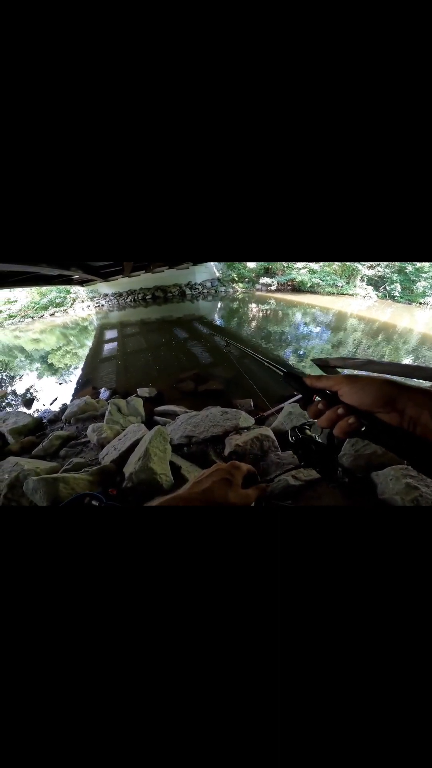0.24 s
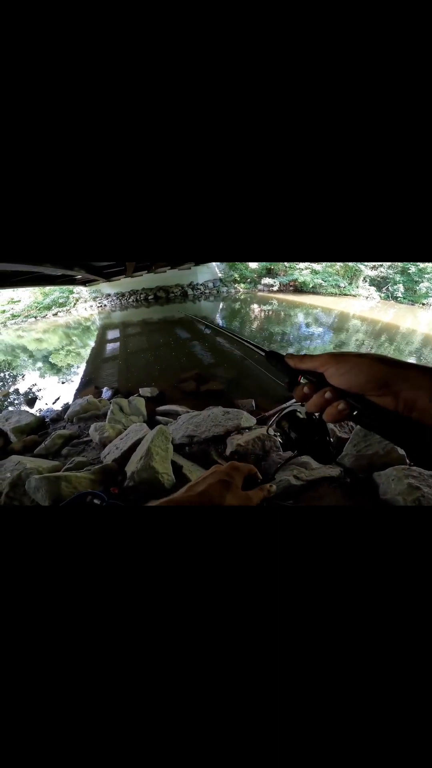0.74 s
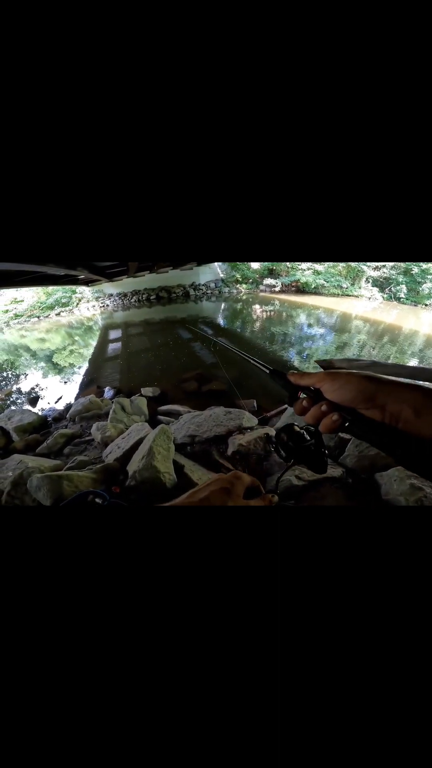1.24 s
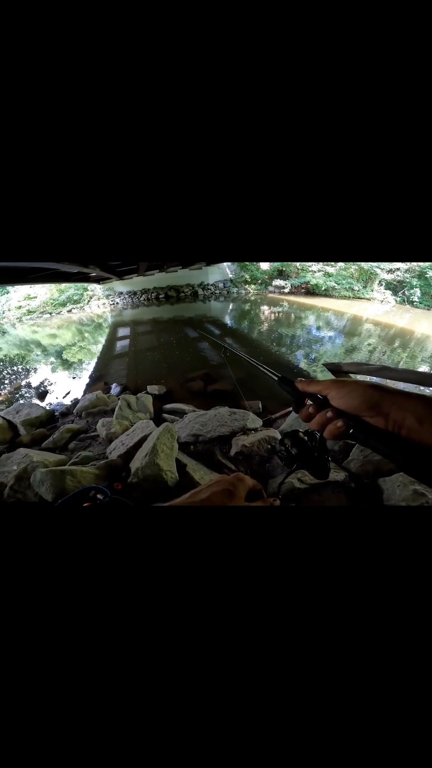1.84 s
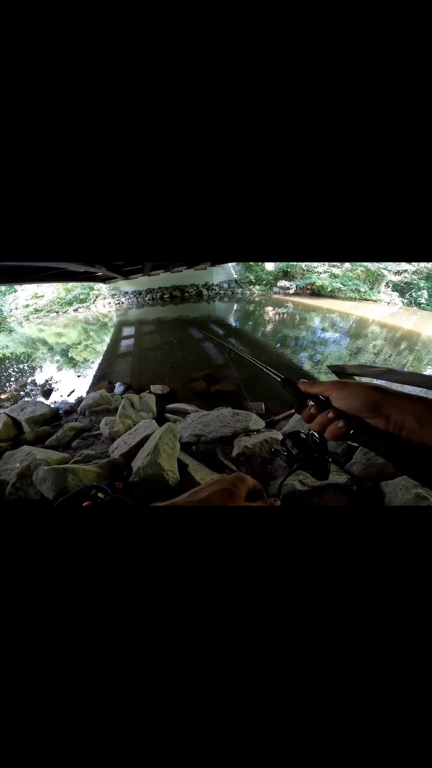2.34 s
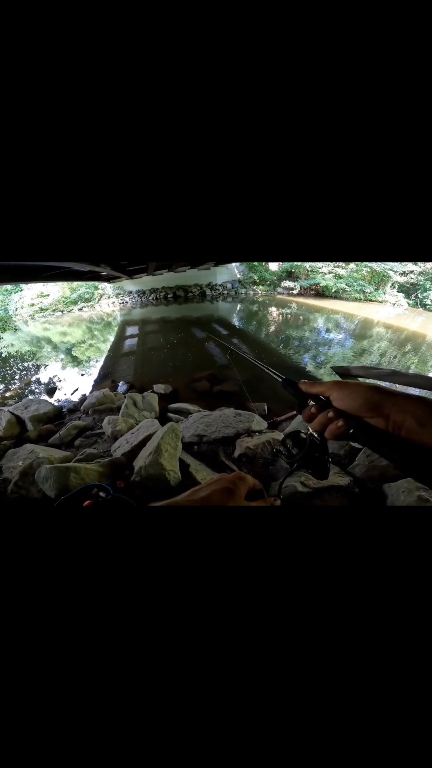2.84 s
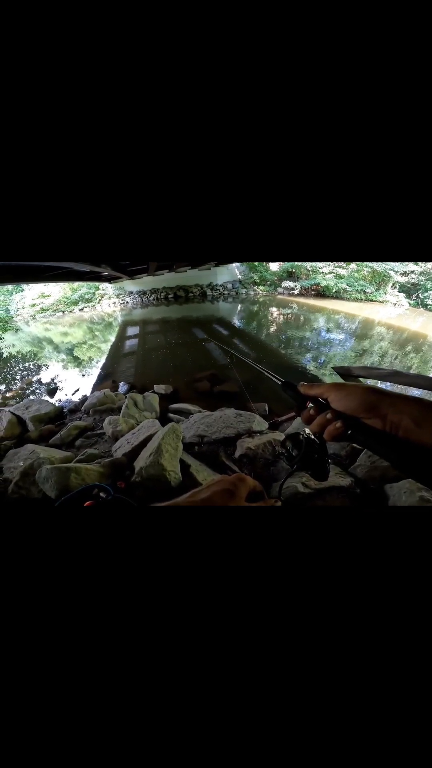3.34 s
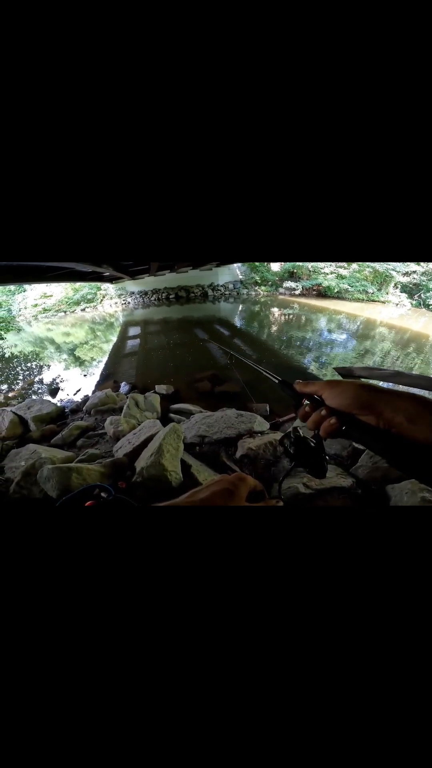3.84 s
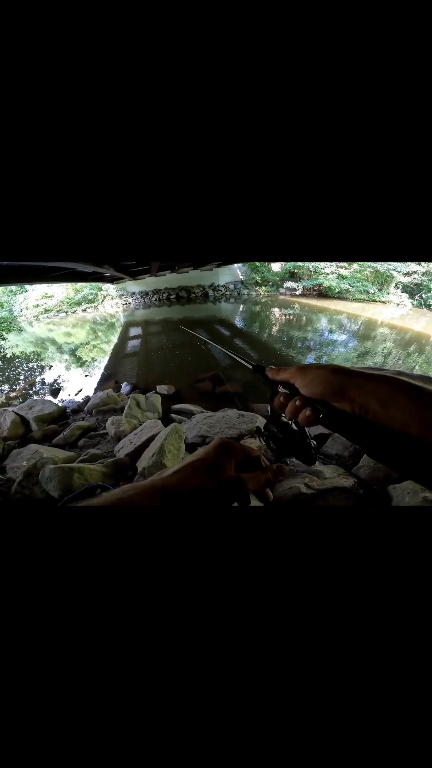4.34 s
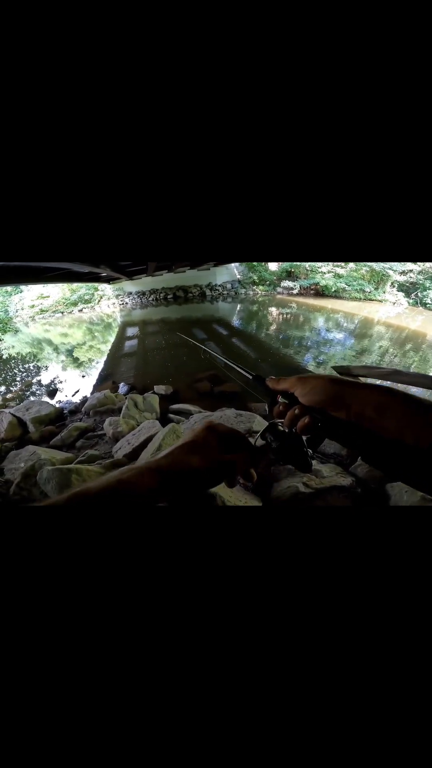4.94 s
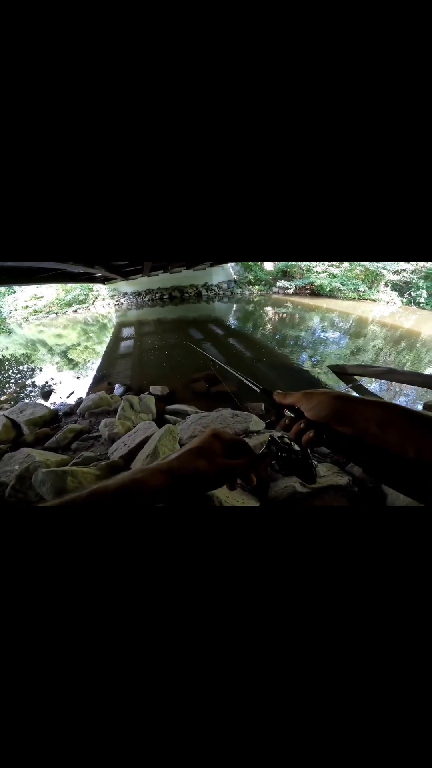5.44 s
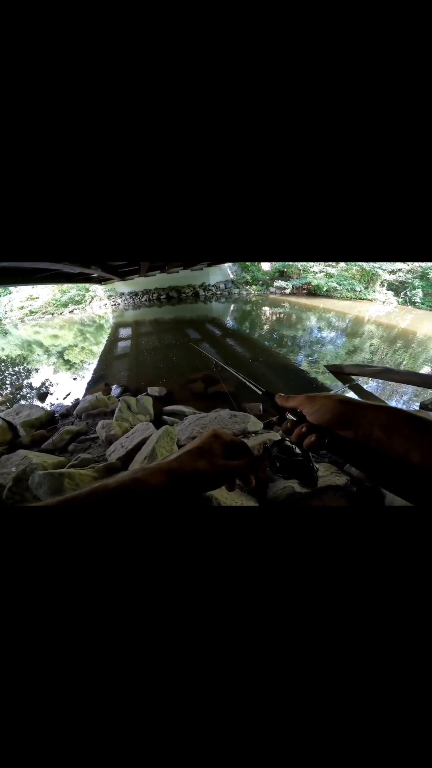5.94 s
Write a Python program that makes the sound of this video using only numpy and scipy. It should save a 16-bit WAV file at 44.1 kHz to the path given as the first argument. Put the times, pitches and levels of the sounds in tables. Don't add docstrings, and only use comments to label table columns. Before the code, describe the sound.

Continuous bright cricket chorus, a little stronger to the left, over faint distant traffic. Low, irregular bridge thuds and a muffled engine rumble build in the middle, with a breathy tyre wash, then thin out. A small drip, two quick bird twitters on the right and a few tiny close metal ticks pass faintly. Open outdoor stereo pickup beneath the span, with short reflections from stone and water.

```python
import sys
import numpy as np
from scipy import signal
from scipy.fft import rfft, irfft, next_fast_len
from scipy.io import wavfile
from scipy.ndimage import uniform_filter1d

SR = 44100
rng = np.random.default_rng(int(sys.argv[2]) if len(sys.argv) > 2 else 0)


def invert_db(level):
    return 10 ** (np.asarray(level, dtype=float) / 20)


def generate_wav(signal):
    frames = np.transpose(np.atleast_2d(signal))
    scaled = np.clip(frames, -1, 1) * 32767
    pcm = np.round(scaled).astype(np.int16)
    wavfile.write(sys.argv[1], SR, pcm)


N = 273851


def evened(x):
    return x / np.sqrt(np.mean(x ** 2) + 1e-20)


def read(points, hz):
    f, value = np.transpose(points)
    return np.interp(np.log(hz + 1), np.log(f + 1), value)


def add(mix, start_s, sound):
    part = mix[round(start_s * SR):][:len(sound)]
    part += sound[:len(part)]


def wander(top_hz):
    f = np.geomspace(top_hz / 12, top_hz, 16)
    t = np.arange(0, N + 256, 256) / SR
    phase = 2 * np.pi * (t[:, None] * f + rng.random(16))
    slow = np.sin(phase) @ f ** -.5
    return evened(np.interp(np.arange(N) / SR, t, slow))


# frequency in Hz, left-right likeness from 0 to 1.
COHERENCE = [(30, .998), (60, .9996), (150, .999), (250, .993), (450, .96), (720, .83), (1100, .83),
             (2200, .74), (3500, .59), (5500, .76), (6800, .87), (7500, .82), (8200, .55), (8800, .72),
             (11000, .4)]
# frequency in Hz, left minus right in dB.
LEVEL_DIFFERENCE = [(150, 0), (250, .2), (450, 1.6), (900, 3.8), (1400, 3.1), (2200, 2.6), (3500, -.5),
                    (4500, -1.1), (5500, -.2), (7400, 5), (8200, 1.8), (8800, .4), (10500, 2.7), (12000, 5)]
# frequency in Hz, lead of the left in radians.
PHASE_LEAD = [(150, 0), (450, -.05), (720, -.29), (1100, -.44), (2200, -.94), (2800, -.95), (3600, -.46),
              (4500, -.16), (5500, 0), (7400, .07), (8200, .29), (8800, 0)]


def noise(colour):
    size = next_fast_len(N)
    hz = np.fft.rfftfreq(size, 1 / SR)
    shared, separate = rfft(rng.standard_normal((2, size)))
    same = np.clip(read(COHERENCE, hz), -1, 1)
    lean = invert_db(read(LEVEL_DIFFERENCE, hz) / 2)
    delayed = shared * np.exp(-1j * read(PHASE_LEAD, hz))
    left = shared * lean
    right = (same * delayed + np.sqrt(1 - same ** 2) * separate) / lean
    heard = (hz > colour[0][0]) & (hz < colour[-1][0])
    pair = irfft(np.array([left, right]) * invert_db(read(colour, hz)) * heard, size)[:, :N]
    return pair / np.sqrt(np.mean(pair.mean(0) ** 2))


def steadied(pair, seconds):
    power = uniform_filter1d(pair.mean(0) ** 2, round(seconds * SR))
    return pair / np.sqrt(abs(power) + 0.046)


def bank(x, t60):
    taps = np.zeros((2, SR))
    at = np.arange(200, SR - 20, 20) + rng.integers(0, 20, (2, (SR - 201) // 20))
    np.put_along_axis(taps, at, rng.choice([-1., 1.], at.shape), 1)
    taps *= invert_db(-60 * np.arange(SR) / SR / t60)
    return signal.fftconvolve(x[None], taps / np.linalg.norm(taps[0]), axes=1)[:, :N]


def swells(floor_db, rows):
    t = np.arange(0, N + 64, 64) / SR
    power = sum(invert_db(2 * db) * np.exp(-((t - s) / half) ** 2) for s, half, db in rows)
    return np.sqrt(invert_db(2 * floor_db) + np.interp(np.arange(N) / SR, t, power))


# time in seconds, weight on the span from 0 to 1, nearness of the tyres from 0 to 1.
PASSAGE = [(0, 0.2, 0.27), (.3, 0, 0.47), (.65, 0.18, 0.2), (1.2, 0.04, 0.35), (1.28, 0.43, .25),
           (1.45, 0.5, 0.46), (2.0, 0.91, 0.43), (2.4, .9, 0.46), (2.9, 0.91, 0.66), (3.4, 0.96, 0.95),
           (3.8, 0.88, .95), (4.15, 0.94, 0.5), (4.35, 0.64, 0.4), (4.7, 0.39, 0.1), (5.1, 0.22, 0.22),
           (5.7, 0.04, 0.1), (6.0, 0.14, 0.4), (6.21, 0.36, 0.4)]


def loaded(empty_db, full_db, lag_s, order=1):
    curve = np.transpose(PASSAGE)
    return empty_db + (full_db - empty_db) * np.interp(np.arange(N) / SR - lag_s, curve[0], curve[order])


# frequency in Hz, level in dB per Hz.
SWAY_COLOUR = [(4, -10.5), (8, 4.5), (14, 10), (18, 9.5), (24, -3), (30, 2.5), (40, -66)]
# frequency in Hz, level in dB per Hz.
BOOM_COLOUR = [(22, -60.5), (30, -13), (38, -3), (46, -6), (52, 2.5), (58, -6.5), (65, -10.5), (74, -37.5),
               (100, -90)]
# time in seconds, sway level in dB, boom level in dB.
JOINT_JOLTS = [(.2, -36.5, -38), (.43, -34.5, -41), (.92, -54, -35.5), (1.13, -36, -35), (1.44, -32, -37),
               (1.62, -48, -28.5), (1.79, -28, -31.5), (2.07, -27.5, -38), (2.4, -26.5, -43),
               (2.7, -28, -44), (2.89, -33.5, -32.5), (3.21, -30.5, -36), (3.33, -25.5, -29.5),
               (3.55, -24.5, -37), (3.82, -24, -42), (3.96, -42, -29.5), (4.15, -25.5, -30.5),
               (4.39, -34.5, -26), (4.6, -32.5, -28), (4.77, -30.5, -27.5), (4.97, -33, -32),
               (5.14, -31.5, -37), (5.33, -31.5, -30.5), (5.52, -49, -30), (5.78, -35, -35.5),
               (5.94, -39.5, -37.5), (6.1, -34, -49)]


def deck():
    sway_jolts = [(s, 0.071, db) for s, db, _ in JOINT_JOLTS]
    boom_jolts = [(s, 0.057, db) for s, _, db in JOINT_JOLTS]
    sway = swells(loaded(empty_db=-58, full_db=-30.5, lag_s=.3), sway_jolts)
    boom = swells(loaded(empty_db=-39, full_db=-40.5, lag_s=.3), boom_jolts)
    return sway * steadied(noise(SWAY_COLOUR), 0.15) + boom * steadied(noise(BOOM_COLOUR), 0.11)


# frequency in Hz, level in dB per Hz.
ENGINE_COLOUR = [(41, -36.5), (69, -0.5), (113, -0.5), (190, -10), (250, -28.5), (420, -120)]
# frequency in Hz, level in dB per Hz.
DRONE_COLOUR = [(110, -30), (190, -1), (339, -5), (386, -11), (473, -9), (700, -14), (910, -38),
                (1540, -120)]
# time in seconds, half length in seconds, level in dB.
ENGINE_SURGES = [(0.1, 0.031, -43), (0.417, .05, -43), (1.154, 0.017, -36), (1.29, 0.034, -31.5),
                 (1.436, 0.12, -30.5), (1.757, 0.24, -31.5), (2.504, 0.12, -36), (2.695, 0.048, -33.5),
                 (3.247, 0.064, -42), (3.673, 0.078, -32.5), (3.915, 0.12, -31), (4.182, 0.098, -30.5),
                 (4.397, 0.035, -32), (4.65, 0.13, -35), (4.944, 0.1, -36.5), (5.385, 0.091, -38)]


def engine_and_body():
    shudders = [(s, half, db - 10.5) for s, half, db in ENGINE_SURGES]
    engine = swells(loaded(empty_db=-40.5, full_db=-33, lag_s=0.01), ENGINE_SURGES)
    drone = swells(loaded(empty_db=-51.5, full_db=-35.5, lag_s=0.0091), shudders)
    return engine * steadied(noise(ENGINE_COLOUR), 0.062) + drone * steadied(noise(DRONE_COLOUR), 0.079)


# frequency in Hz, level in dB per Hz.
ROAR_COLOUR = [(560, -28), (690, -5), (807, -3), (880, -0.5), (944, 2), (1050, -2.5), (1430, -6.5),
               (1700, -11), (2100, -16.5), (2500, -56.5)]
# frequency in Hz, level in dB per Hz.
HISS_COLOUR = [(1900, -36.5), (2150, -0.5), (2600, -4.5), (3200, -7.5), (4000, -12.5), (5000, -14.5),
               (6200, -12.5), (8000, -19), (8400, -21), (9200, -24), (10000, -29.5), (10400, -34),
               (10800, -61)]


def tyres():
    roar = invert_db(loaded(empty_db=-47.5, full_db=-43, lag_s=.01, order=2))
    hiss_by_load = loaded(empty_db=-65.5, full_db=-61, lag_s=.01)
    hiss_by_nearness = loaded(empty_db=-65.5, full_db=-61, lag_s=.01, order=2)
    hiss = invert_db(2 + (hiss_by_load + hiss_by_nearness) / 2)
    roaring = roar * noise(ROAR_COLOUR) * invert_db(0.46 * wander(28))
    return roaring + hiss * noise(HISS_COLOUR) * invert_db(.5 * wander(25))


# frequency in Hz, level in dB per Hz.
FAR_ROAD_COLOUR = [(120, -29.5), (170, -2), (225, -4.5), (270, -10.5), (380, -12.5), (520, -12), (700, -14),
                   (900, -47)]


def far_road():
    return invert_db(-47) * noise(FAR_ROAD_COLOUR)


def beats(per_s, first_s, db):
    s = np.arange(first_s, N / SR, 1 / per_s)
    chance = rng.standard_normal((len(s), 2))
    return np.transpose([s + .003 * chance[:, 0], db + chance[:, 1]])


def stroke(hz, length_s, sag):
    u = np.arange(round(length_s * SR)) / round(length_s * SR)
    pitch = hz * (1 + sag * (.5 - u))
    return np.sin(np.pi * u ** 0.76) ** 2 * np.sin(2 * np.pi * np.cumsum(pitch) / SR)


def near_cricket(rows, hz, length_s):
    out = np.zeros(N)
    for (s, db), off in zip(rows, rng.standard_normal(len(rows))):
        add(out, max(s - .003, 0), invert_db(db - 3.5) * stroke(hz * (1 + .002 * off), length_s, .006))
    return out


# frequency in Hz, level in dB.
CHORUS_COLOUR = [(5900, -40), (6200, -23), (6500, -13), (6820, -9), (6900, -4), (7100, -3), (7200, 0),
                 (7320, -5), (7450, -2), (7550, -9), (7850, -12), (8050, -19), (8300, -26), (8600, -45)]


def chorus(count):
    out = np.zeros((2, N))
    for k, (tune, pace, start, side, loud) in enumerate(rng.random((count, 5))):
        hz = 6250 + 2100 * (k + tune) / count
        times = np.arange(-start, N / SR * 16) / (13.2 + 2.2 * pace)
        times = times + .003 * np.cumsum(rng.standard_normal(len(times)))
        times = times[(times >= 0) & (times < N / SR)]
        train = np.zeros(N)
        train[(times * SR).astype(int)] = invert_db(0.83 * rng.standard_normal(len(times)))
        song = signal.oaconvolve(train, stroke(hz, 0.027, 0.0063))[:N]
        song *= invert_db(read(CHORUS_COLOUR, np.array(hz)) + 1.7 * loud)
        out += song * invert_db([[2 + 2.7 * (side - .5)], [-2 - 4 * (side - .5)]])
    return invert_db(-58.5) * evened(out + invert_db(-8) * bank(out.mean(0), 0.48))


# pitch in Hz, strokes per second, first stroke in seconds, stroke length in seconds.
NEAR_SINGERS = [(6960, 13.54, .004, .022), (7200, 13.58, .010, .03), (7445, 13.6, .013, .024),
                (7445, 14.91, .027, .024), (7200, 14.92, .029, .026), (7740, 14.9, .025, .022),
                (6975, 17.56, .017, .02)]
NEAR_SINGER_DB = [-53, -54.5, -50, -57, -55, -58, -60.5]


def crickets():
    near = np.zeros(N)
    for (hz, per_s, first_s, length_s), db in zip(NEAR_SINGERS, NEAR_SINGER_DB):
        near += near_cricket(beats(per_s, first_s, db), hz, length_s)
    haze = invert_db(-55.5 + 0.43 * wander(4.4)) * noise(CHORUS_COLOUR)
    return near * invert_db([[2.4], [-2.8]]) + invert_db(-15) * bank(near, 0.52) + chorus(count=44) + haze


# frequency in Hz, level in dB per Hz.
MURMUR_COLOUR = [(11300, -30), (11700, -3), (12000, 0), (12600, -3), (12900, -20), (13900, -18),
                 (14300, -9), (14900, -12)]
# frequency in Hz, level in dB per Hz.
SWELL_COLOUR = [(10000, -16), (10600, -7), (11200, -7), (11600, -4), (12000, 0), (12400, -2), (12800, -6),
                (13200, -10), (13700, -17), (14800, -21), (15200, -40)]
# time in seconds, half length in seconds, level in dB.
INSECT_SWELLS = [
    (.3, 0.15, -87),
    (1.3, .15, -92),
    (2.6, 0.99, -91),
    (3.4, 0.64, -89.5),
    (3.85, .15, -86),
    (4.3, 0.16, -92.5),
]


def treetops():
    murmur = invert_db(-99) * noise(MURMUR_COLOUR)
    swelling = swells(-117.5, INSECT_SWELLS) * noise(SWELL_COLOUR)
    return (murmur + swelling) * invert_db(.7 * wander(15))


TRILL_PITCH = (6440, 6540, 6640)


def slow_singer():
    trills = beats(per_s=3.82, first_s=.135, db=-63)
    song = sum(near_cricket(trills + [.031 * k, 0], hz, 0.027) for k, hz in enumerate(TRILL_PITCH))
    return song * invert_db([[1.5], [-1.5]]) + invert_db(8.5) * bank(song, .2)


# start in seconds, length in seconds, level in dB.
KATYDID_RASPS = [
    (.31, .26, -65),
    (1.29, .24, -65),
    (2.8, .2, -69),
    (3.56, .15, -70),
    (4.87, .22, -66),
    (5.86, .25, -63.5),
]


def katydid():
    wing_filter = signal.butter(3, [5550, 6800], "band", fs=SR, output="sos")
    out = np.zeros(N)
    for s, length_s, db in KATYDID_RASPS:
        size = round(length_s * SR)
        teeth = (rng.random(size) < 1800 / SR) * rng.standard_normal(size)
        wing = signal.sosfilt(wing_filter, teeth)
        add(out, s, invert_db(db) * evened(wing) * signal.windows.tukey(size, .7))
    return invert_db(-3) * out + invert_db(-3) * bank(out, .2)


# start in seconds, pitch in Hz, level in dB.
WATER_DRIPS = [
    (1.535, 2620, -52),
    (1.55, 2250, -58),
    (3.04, 2550, -58),
    (5.505, 2700, -59),
]


def drips():
    out, t = np.zeros(N), np.arange(2000) / SR
    for s, hz, db in WATER_DRIPS:
        ring = invert_db(db - 60 * t / 0.11) * np.minimum(t / .004, 1)
        add(out, s, ring * np.sin(2 * np.pi * hz * t * (1 + .6 * t)))
    return out


# start in seconds, length in seconds, first pitch in Hz, last pitch in Hz, level in dB.
BIRD_NOTES = [(2.197, 0.031, 3530, 6320, -62), (2.235, 0.014, 4700, 5830, -68),
              (2.27, .02, 6200, 4440, -64), (2.322, 0.02, 5640, 6660, -62), (2.37, 0.022, 6000, 3950, -66),
              (2.428, .02, 4620, 5950, -70), (4.296, 0.025, 3600, 5850, -60.5),
              (4.329, .015, 4450, 5680, -71), (4.375, 0.024, 6000, 3580, -64),
              (4.41, 0.02, 4760, 6250, -65), (4.475, .02, 6000, 4400, -68)]


def bird():
    out = np.zeros(N)
    for s, length_s, from_hz, to_hz, db in BIRD_NOTES:
        u = np.arange(round(length_s * SR)) / round(length_s * SR)
        hz = from_hz + (to_hz - from_hz) * u ** .9
        add(out, s, invert_db(db) * np.sin(np.pi * u) ** 0.55 * np.sin(2 * np.pi * np.cumsum(hz) / SR))
    return out * invert_db([[-9], [3]]) + bank(out, .06) + invert_db(10) * bank(out, 1.2)


# start in seconds, peak level in dB, pitch in Hz.
REEL_TICKS = [
    (3.858, -59, 12400),
    (3.917, -66, 12900),
    (3.917, -67, 10600),
    (3.94, -74, 10460),
    (4.326, -76, 11400),
    (3.94, -57, 5300),
    (4.005, -59, 5600),
]


def reel():
    out, t = np.zeros(N), np.arange(300) / SR
    for s, db, hz in REEL_TICKS:
        add(out, s, invert_db(db - 60 * t / .006) * np.sin(2 * np.pi * hz * t))
    return out * invert_db([[2], [-2.5]])


def scene():
    vehicle = deck() + engine_and_body() + tyres() + far_road()
    insects = crickets() + treetops() + slow_singer() + katydid()
    return vehicle + insects + drips() + bird() + reel()


def top_cut(x):
    return signal.sosfilt(signal.butter(12, 14900, fs=SR, output="sos"), x)


def record(dry):
    edge = np.minimum(.05 + np.arange(N)[::-1] / 200, 1)
    return top_cut(dry * edge)


dry = scene()
out = record(dry)
generate_wav(out)
```